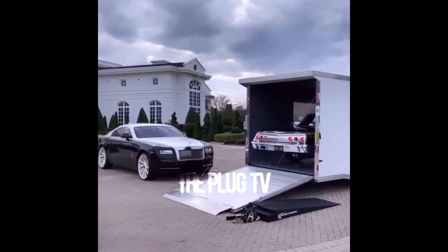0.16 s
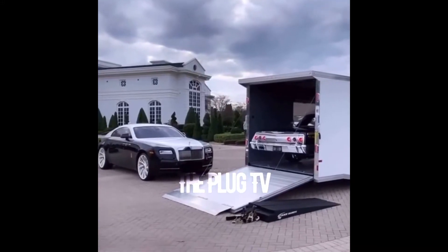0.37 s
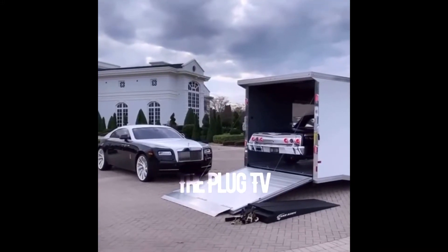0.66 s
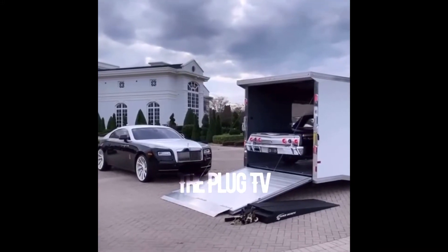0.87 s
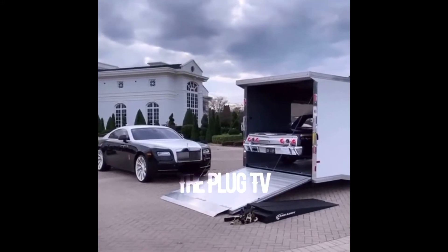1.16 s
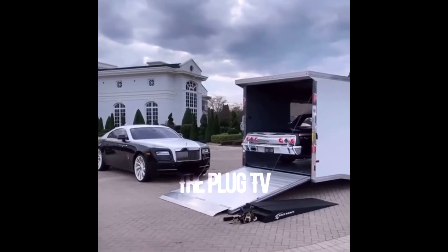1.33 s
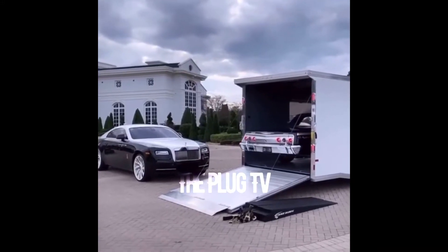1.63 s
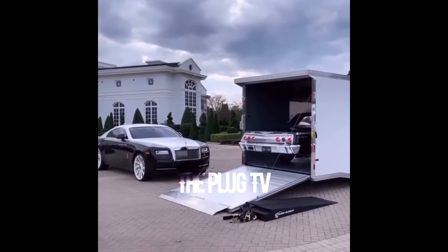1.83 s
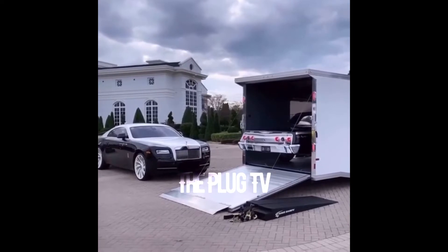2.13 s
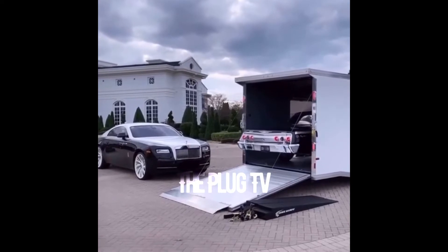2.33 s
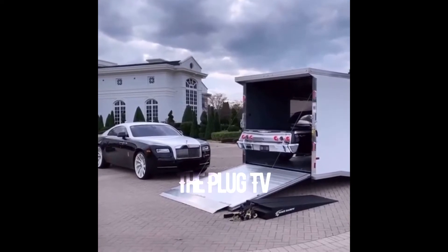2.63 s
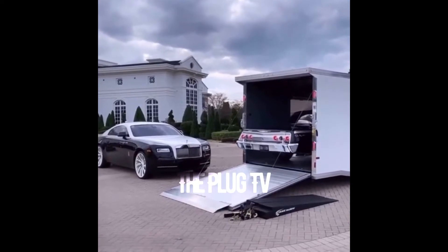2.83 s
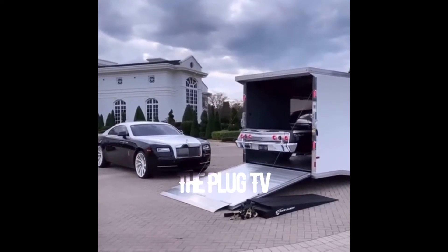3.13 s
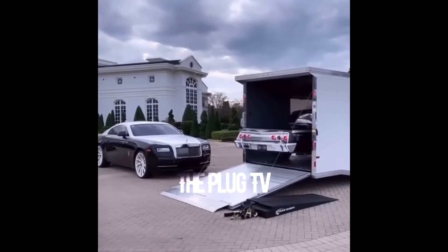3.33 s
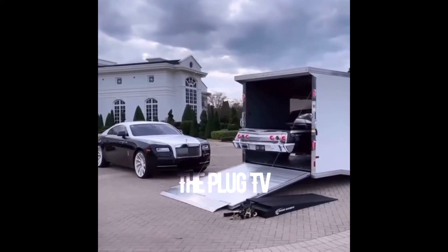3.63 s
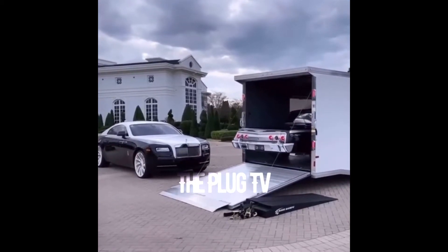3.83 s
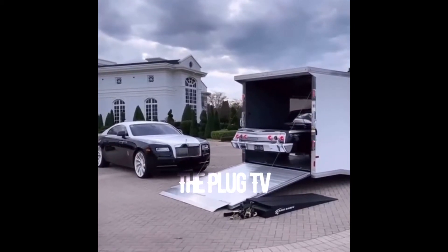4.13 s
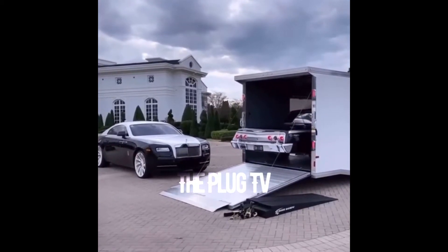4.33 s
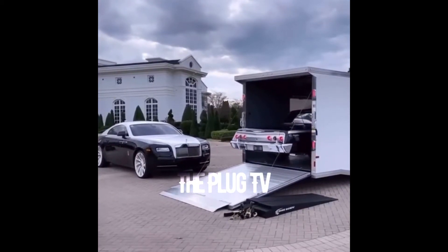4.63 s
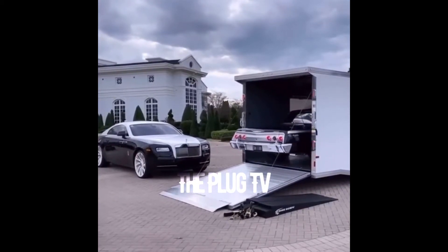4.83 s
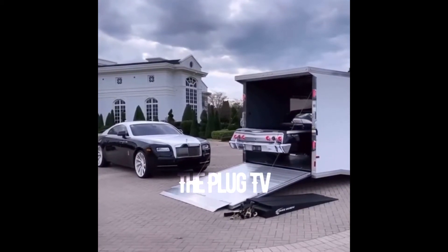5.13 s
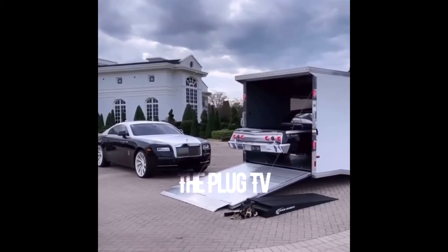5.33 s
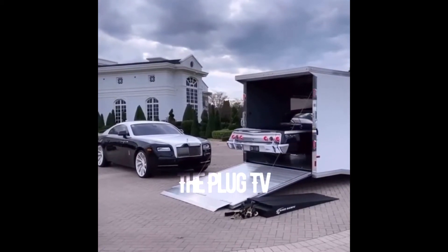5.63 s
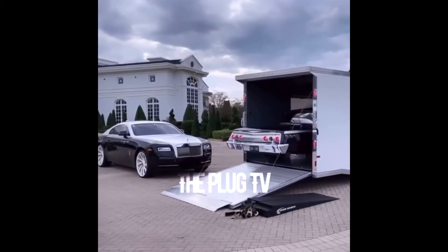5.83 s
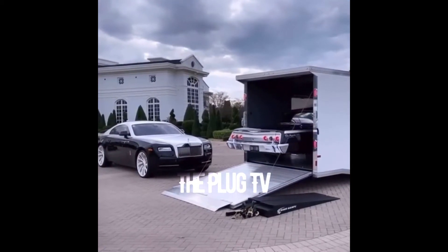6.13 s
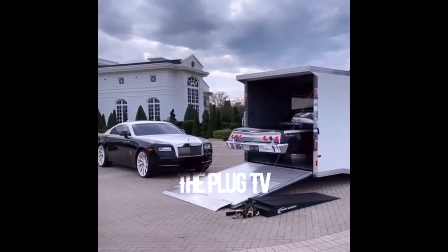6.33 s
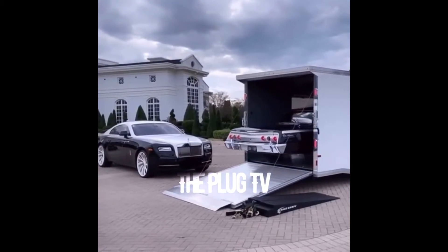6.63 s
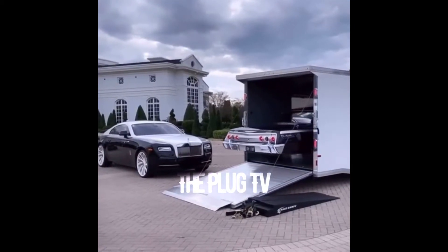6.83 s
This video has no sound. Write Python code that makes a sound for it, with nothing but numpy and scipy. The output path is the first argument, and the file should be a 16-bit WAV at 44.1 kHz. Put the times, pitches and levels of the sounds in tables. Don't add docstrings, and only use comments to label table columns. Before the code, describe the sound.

From 0 s a large eight-cylinder engine is already idling: a deep, lumpy rumble of about fifty firings a second, strongest around 50 Hz with boomy overtones from a hollow trailer. It rises slightly by 0.6 s, then eases gradually lower to the end, never revving. Over it sit a soft fan rush, wavering panel hums and a thin belt whine near 1.5 kHz, sliding down quickly at the start. Tyre rustle opens the scene and fades; small scuffs recur. Metal ramp knocks with loose rattles come at 0.8 and around 0.95 s, a light tick at 1.8, a cluster at 2.7-2.8. Rustle swells strongest near 4.65 s, with clacks at 4.8 and 5.2-5.4. Another roll peaks near 6.45 s, among knocks at 6.15-6.4, and a sharp, bright clack lands at 6.9 s. Outdoors, steady single microphone; the engine continues to the cut at 7 s.

```python
import sys
import numpy as np
from scipy import signal
from scipy.io import wavfile
from scipy.ndimage import uniform_filter1d

SR = 44100
rng = np.random.default_rng(int(sys.argv[2]) if len(sys.argv) > 2 else 0)


def dump_mix(stems):
    frames = np.atleast_2d(stems).T
    limited = np.clip(frames, -1, 1)
    pcm = np.round(limited * 32767).astype(np.int16)
    wavfile.write(sys.argv[1], SR, pcm)


def gain_from_db(level_db):
    decades = np.asarray(level_db, float) / 20
    return 10 ** decades


N = 308259
T = np.arange(N) / SR

# time_s, speed_cycles_per_s
ENGINE_SPEED = [(0.0, 6.432), (0.59, 6.628), (0.78, 6.612), (1.18, 6.43), (1.52, 6.412), (2.25, 6.501),
                (2.75, 6.36), (2.99, 6.351), (3.3, 6.309), (3.77, 6.279), (4.32, 6.183), (4.93, 6.194),
                (5.33, 6.282), (5.92, 6.273), (6.29, 6.113), (6.65, 6.114), (6.99, 6.07)]
# time_s, firing_order_db, box_boom_db
ENGINE_LOAD = [(0, -24.3, -23.7), (.55, -24.5, -23.5), (.8, -25, -25.5), (1.1, -25.4, -22.6),
               (1.4, -24.5, -25.4), (2.33, -25.1, -22.7), (2.72, -25.5, -25.5), (3, -24.4, -23.4),
               (3.8, -24.9, -24.2), (4.15, -25.6, -27.5), (4.42, -24.2, -30.8), (4.68, -24.5, -28.5),
               (5.2, -25.5, -28.8), (5.48, -26.3, -24.6), (6.08, -26.5, -25.3), (6.3, -26.9, -33),
               (6.5, -25.6, -27.8), (6.99, -25.6, -28.6)]
LEADING_ORDERS = (8, 13, 16, 21)
EXHAUST_PULSES = [(.789, .037), (.621, .009), (.957, .033), (.431, .008), (.34, .032), (1.268, .031),
                  (.268, -.004), (.746, .031)]
# pitch_hz, width_hz, signed_gain
PIPE_MODES = [(51.3, 7.0, -.018), (64.5, 2.5, .024), (85.4, 7.0, .029), (94.7, 2.0, -.013)]
MANIFOLD_CRACKS = [(.576, .0943), (.323, .0225), (1.169, -.0257), (1.053, .0721), (1.026, .0416),
                   (1.404, .0099), (.395, .0292), (.922, .0518)]
# pitch_hz, width_hz, signed_gain
MANIFOLD_MODES = [(158.3, 8, 1), (212.1, 8, -.28), (266.7, 60, .09)]
MUFFLER_DB = {6: 8, 7: 4, 10: .5, 16: -1, 18: 5, 21: -.5}
# pitch_hz, level_db
BOX_RIPPLE = [(135, 0), (152, 2), (180, -7.5), (205, 2), (240, -2.5), (288, 2), (322, -4.5), (365, 3),
              (400, -1.5)]
# pitch_hz, level_db_per_hz
FAN_SPECTRUM = [(30, -9.5), (60, 0.5), (100, 2), (160, -3.5), (245, -2.5), (380, -10.5), (497, -13.5),
                (657, -7.5), (990, -10), (1460, -11), (2300, -15), (4200, -21.5), (5900, -27.5),
                (8600, -24)]
# pitch_hz, width_hz, start_s, end_s, level_db
PANEL_HUMS = [(366.4, 4.3, 0.5, 5.12, -55.5), (295.7, 3, -1, 2.1, -51.5), (286, 5, 3, 8, -54),
              (212.5, 3, 0, 2.9, -51.5), (432, 5, 4.9, 7.5, -59.5), (683, 3, 0.5, 3.6, -57),
              (686, 3.5, 5.5, 6.8, -55.5), (621, 5.5, 0.5, 2.3, -62.5), (629, 4, 4, 5.9, -58),
              (578, 5, 3.4, 4.1, -56.5), (1368, 5, 0, 8, -59.5), (1886, 5, 1, 4.7, -57.5),
              (1900, 6, 6, 8.1, -56), (1470, 10, 4, 4.9, -53.5), (1870, 10, 4, 4.8, -56.5),
              (268, 10, 7, 8, -51)]
# multiple_of_cycle, width_hz, level_db
BELT_ROTOR = [(230.7, 23, 0)]
# middle_s, half_length_s, rustle_rise_db
CAR_LURCHES = [
    (0, 0.33, 5),
    (0.793, 0.22, 1),
    (2.003, 0.33, 0),
    (2.744, 0.11, 2.5),
    (3.496, 0.1, 1.5),
    (4.149, 0.25, 2.5),
    (4.656, 0.34, 9),
    (4.877, 0.19, 1),
    (5.299, 0.47, 1.5),
    (6.448, 0.33, 5),
]
# pitch_hz, level_db_per_hz
RUSTLE_SPECTRUM = [(600, -32), (1200, 0.5), (2500, 1), (3600, 1.5), (4100, 2), (4400, -4.5), (5000, -5.5),
                   (8600, -21.5)]
# start_s, level_db, pitch_hz, t60_s
PLATE_RINGS = [(.816, -38, 2540, 0.044), (.816, -42, 2680, .03), (.934, -52, 3960, 0.12),
               (.966, -38, 2600, .04), (.968, -33, 758, 0.04), (.9665, -35.5, 1660, .04),
               (.977, -43, 2330, .06), (.968, -43, 1260, 0.046), (.955, -38, 303, .15), (.99, -41, 290, .1),
               (.97, -40, 200, .1), (.975, -39, 1495, .06), (.979, -47.5, 3320, .04),
               (1.821, -37.5, 2280, .04), (2.689, -39, 747, 0.061), (2.746, -38, 2290, .03),
               (2.75, -41, 1960, 0.046), (2.797, -44, 2330, 0.034), (2.827, -38.5, 2240, 0.036),
               (4.813, -35.5, 2635, .035), (4.813, -36.5, 2085, .03), (5.198, -39.5, 2286, .05),
               (5.369, -42.5, 2160, 0.056), (5.365, -41, 2060, .05), (6.146, -33.5, 2650, 0.045),
               (6.149, -36.5, 2540, .04), (6.149, -33.5, 1970, 0.033), (6.156, -40, 1883, .03),
               (6.203, -36.5, 2520, 0.14), (6.212, -40.5, 1610, 0.17), (6.234, -34.5, 750, .05),
               (6.245, -45.5, 2640, .04), (6.249, -34, 2285, .03), (6.250, -35, 1634, 0.046),
               (6.381, -38, 2565, 0.089), (6.389, -34.5, 1890, 0.049), (6.912, -27.5, 1790, 0.028),
               (6.913, -35, 2300, 0.028), (6.912, -34, 1615, 0.031), (6.914, -41, 653, 0.11),
               (6.915, -35, 950, .04), (6.927, -38, 520, 0.057), (6.919, -39, 1740, 0.036),
               (6.927, -39, 1720, .04), (6.939, -46, 1500, 0.032), (6.918, -39, 3030, 0.044)]
# start_s, level_db, top_hz
FITTING_RATTLES = [(.816, -45, 3520), (.957, -44, 4670), (.965, -38.5, 4300), (.978, -44, 4800),
                   (1.821, -55, 3460), (2.689, -43, 4500), (2.745, -41.5, 8470), (2.827, -59, 3970),
                   (4.76, -44.5, 5520), (4.813, -41, 3510), (5.36, -41, 2820), (6.148, -42, 2980),
                   (6.204, -42, 3020), (6.245, -39, 3810), (6.388, -40.5, 3020), (6.9128, -38.5, 2610)]
# middle_s, half_length_s, level_db
TREAD_SCUFFS = [(.99, .03, -52), (1.58, .03, -47), (2.04, .04, -48), (2.33, .02, -50), (2.51, .02, -57),
                (2.71, .025, -58), (2.77, .03, -51), (3.08, .025, -55), (3.46, .05, -55), (3.97, .03, -58),
                (4.28, .02, -55), (4.77, .025, -41.5), (5.02, .03, -53.5), (5.3, .025, -54.5),
                (5.54, .04, -48.5), (5.92, .035, -52), (6.26, .04, -50.5), (6.62, .03, -54),
                (6.93, .03, -48)]
# pitch_hz, level_db_per_hz
SCUFF_SPECTRUM = [(1500, -13.5), (3000, 0.5), (5000, -3), (8700, -3.5)]


def evened(x):
    return x / np.sqrt(np.mean(abs(x) ** 2) + 1e-20)


def columns(rows, t):
    s, *values = np.transpose(rows)
    return [np.interp(t, s, v) for v in values]


def wander(per_s, t, count):
    noise = rng.standard_normal((count, 400))
    noise = uniform_filter1d(uniform_filter1d(noise, size=4), size=4)
    knots_s = np.arange(400) / per_s / 4
    return [np.interp(t, knots_s, evened(row - row.mean())) for row in noise]


def resonate(x, hz, width):
    turn = np.exp(2j * np.pi * np.cumsum(hz * np.ones(len(x))) / SR)
    r = np.exp(-np.pi * width / SR)
    return 2 * (turn * signal.lfilter([1 - r], [1, -r], x / turn)).real


def box_db(hz):
    return np.interp(hz, *np.transpose(BOX_RIPPLE))


def turbulence(spectrum, patchy_db, boxed=0):
    frames, hz = N // 256 + 5, np.fft.rfftfreq(1024, 1 / SR)
    a, b, patches = rng.standard_normal((frames, 513, 3)).T
    patches = evened(uniform_filter1d(uniform_filter1d(patches, size=14, axis=0), size=10, axis=1))
    f, db = np.transpose(spectrum)
    level_db = np.interp(np.log(hz + 1), np.log(f + 1), db, left=-60) + boxed * box_db(hz)
    level_db = level_db[:, None] + patchy_db * patches
    return evened(signal.istft((a + 1j * b) * gain_from_db(level_db), nperseg=1024, noverlap=768)[1][:N])


def rolling_db():
    return sum(db * np.exp(-((T - s) / half) ** 2) for s, half, db in CAR_LURCHES)


def firing(pulses, modes, k):
    strength, late = np.transpose(pulses)
    phases = np.exp(-2j * np.pi * np.outer(k, np.arange(8) / 8 + late))
    pattern = (strength * phases).sum(1)
    hz = k * 6.37
    return pattern * sum(g * f * w / (f * f - hz * hz + 1j * hz * w) for f, w, g in modes)


def leading_db(speed, t):
    null_hz, panel_hz, panel_width_hz = 107.2, 138.7, 1.7
    null_order, panel_order = (n * speed for n in LEADING_ORDERS[2:])
    null_db = -55.5 + 20 * np.log10(abs(null_hz - null_order) + 0.091)
    ring = gain_from_db(2 * -33) / (1 + (2 * (panel_order - panel_hz) / panel_width_hz) ** 2)
    panel_db = 10 * np.log10(ring + gain_from_db(2 * -45.5))
    return *columns(ENGINE_LOAD, t), null_db, panel_db


def exhaust():
    step = 16
    flutter_db, flutter_rad = 5.0, 0.42
    t = np.arange(N // step + 1) * step / SR
    speed = columns(ENGINE_SPEED, t)[0]
    turns = .0135 + np.cumsum(speed) * step / SR
    k = np.arange(4, 61)
    bare = np.sqrt(2) * gain_from_db(-55.0 - 12 * np.log2(k / 24))
    bare = bare * np.exp(2j * np.pi * rng.random(len(k)))
    cracks = gain_from_db(-50) * firing(MANIFOLD_CRACKS, MANIFOLD_MODES, k)
    orders = np.where(k > 21, cracks, firing(EXHAUST_PULSES, PIPE_MODES, k))
    orders = np.where(k > 46, bare, orders)
    levels = dict(zip(LEADING_ORDERS, leading_db(speed, t)))
    common_db = levels[8] - levels[8].mean()
    lump_db = .3 * wander(9, t, count=1)[0]
    quiet = 1 / (1 + np.exp((6.39 - speed) / .02))
    out, shakes = np.zeros(len(t)), wander(1.985, t, count=2 * len(k))
    for j, (n, z) in enumerate(zip(k, orders)):
        if n in levels:
            weak = .04
            size = np.sqrt(2) * gain_from_db(levels[n])
        else:
            weak = np.clip(0.0012 / abs(z), .1, .8)
            boxed = n not in range(22, 47)
            size = abs(z) * gain_from_db(common_db + box_db(n * speed) * boxed)
        size = size * gain_from_db(MUFFLER_DB.get(n, 0) - 10 * (n == 14) * quiet)
        size = size * gain_from_db(flutter_db * weak * shakes[2 * j] + lump_db)
        wall = .3 * n * (speed - 6.33) * (n in range(18, 22))
        flutter = flutter_rad * weak * shakes[2 * j + 1]
        out += size * np.cos(2 * np.pi * n * turns + np.angle(z) + wall + flutter)
    return signal.resample_poly(out, step, 1, padtype="line")[:N]


def fan_rush():
    turns = np.cumsum(columns(ENGINE_SPEED, T)[0]) / SR
    beat_db = .6 * np.cos(2 * np.pi * (6 * turns + .1)) + .4 * np.cos(2 * np.pi * (11 * turns + .2))
    level_db = -45 + 0.13 * rolling_db() + 6.5 + beat_db
    return gain_from_db(level_db) * turbulence(FAN_SPECTRUM, patchy_db=1.2, boxed=0.56)


def panel_hums():
    out, shakes = np.zeros(N), wander(11, T, count=2 * len(PANEL_HUMS))
    for j, (hz, width, start, end, db) in enumerate(PANEL_HUMS):
        on = np.clip(np.minimum(T - start + .2, end - T + .2) / .3, 0, 1)
        turn = np.cumsum(hz + .55 * width * shakes[2 * j]) / SR
        out += gain_from_db(db + 2.5 + 2.2 * shakes[2 * j + 1]) * on * np.cos(2 * np.pi * turn)
    return out


def whine_db():
    hidden = 1 / (1 + np.exp((4.78 - T) / .06))
    slip_db = 3 * np.exp(-T / .9)
    return -51.5 + 0.15 * rolling_db() + slip_db - 3 * hidden


def belt_whine(white):
    speed, out = uniform_filter1d(columns(ENGINE_SPEED, T)[0], size=20000), np.zeros(N)
    for order, width, db in BELT_ROTOR:
        hz = order * speed + 20.12 * np.exp(-T / 0.1997)
        blur = evened(resonate(resonate(white, hz, width), hz, width))
        tone = np.cos(2 * np.pi * np.cumsum(hz) / SR) + .7 * blur
        beads_db = 0.4 * wander(7, T, count=1)[0]
        out += gain_from_db(whine_db() + db - 0.5 + beads_db) * evened(tone)
    return out


def engine_bay():
    white = rng.standard_normal(N)
    panel = evened(resonate(resonate(white, 2265, 90), 2265, 90))
    return fan_rush() + panel_hums() + belt_whine(white) + gain_from_db(-55.5 - .5 * T) * panel


def tyres():
    flicker_db = 1.2 * wander(15, T, count=1)[0]
    grit = gain_from_db(5.2 * np.minimum(rng.exponential(1, N), 4))
    grit = grit * (rng.random(N) < 250 / SR)
    grit = signal.oaconvolve(grit, np.exp(-T[:600] / 0.0027))[:N]
    rustle = turbulence(RUSTLE_SPECTRUM, patchy_db=1.07) * evened(1 + 0.066 * grit)
    return gain_from_db(-51 + rolling_db() + flicker_db) * rustle


def ramp():
    out, t = np.zeros(N + 8000), T[:8000]
    chatter = uniform_filter1d(rng.standard_normal((len(PLATE_RINGS), 8000)), size=90)
    for (s, db, hz, t60), rough in zip(PLATE_RINGS, chatter):
        ring = np.sin(2 * np.pi * hz * t + 0.45 * evened(rough)) * (1 - np.exp(-60 * t / t60))
        out[round(s * SR):][:8000] += ring * gain_from_db(db + 4.0 - 60 * t / t60)
    rise = 1 - np.exp(-t / .002)
    hisses = rng.standard_normal((len(FITTING_RATTLES), 8000))
    for (s, db, top_hz), hiss in zip(FITTING_RATTLES, hisses):
        band = signal.butter(4, [600, min(top_hz, 9000)], "bandpass", fs=SR, output="sos")
        fall_db = 4 * np.exp(-t / 0.013) - 60 * t / 0.24
        out[round(s * SR):][:8000] += evened(signal.sosfilt(band, hiss)) * rise * gain_from_db(db + fall_db)
    return out[:N]


def scuffs():
    puffs = sum(gain_from_db(db) * np.exp(-((T - s) / half) ** 2) for s, half, db in TREAD_SCUFFS)
    return turbulence(SCUFF_SPECTRUM, patchy_db=3.5) * puffs


def scene():
    return (exhaust() + engine_bay() + tyres() + ramp() + scuffs())[None]


def band_limit(x):
    return signal.sosfilt(signal.butter(12, 8720, fs=SR, output="sos"), x)


def record(dry):
    edge = signal.firwin(1801, 8605, window=("kaiser", 9), fs=SR)
    mix = signal.oaconvolve(dry, edge[None], "same")
    return band_limit(mix)


dry = scene()
out = record(dry)
dump_mix(out)
```